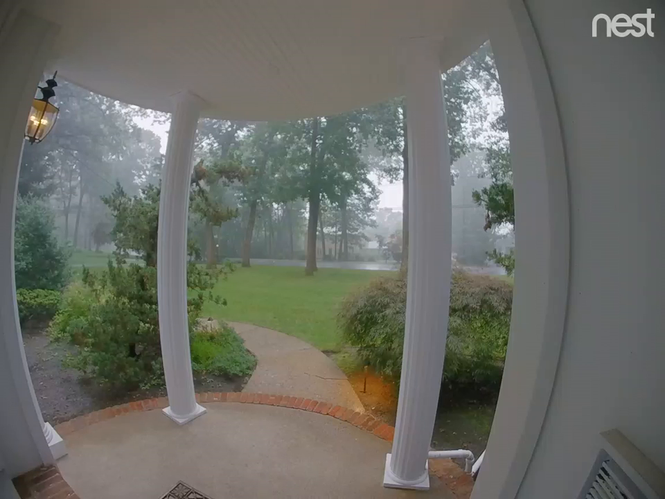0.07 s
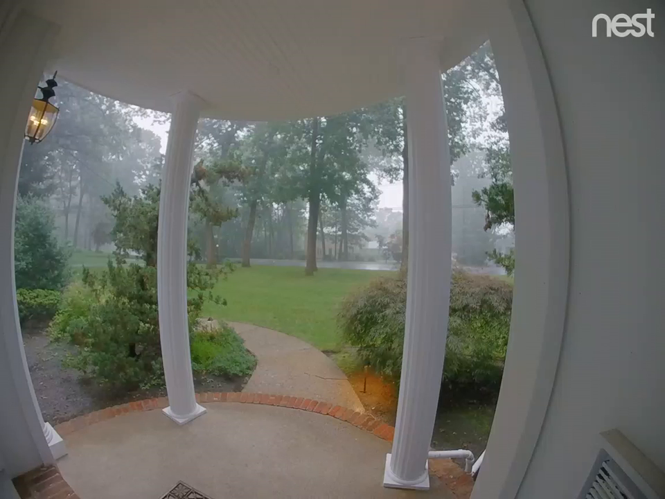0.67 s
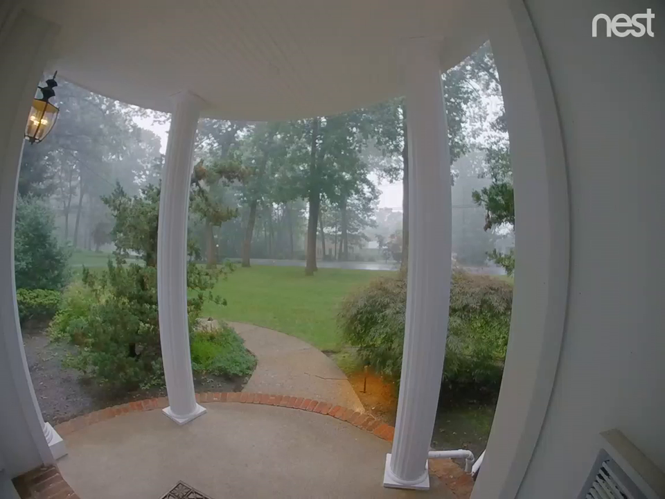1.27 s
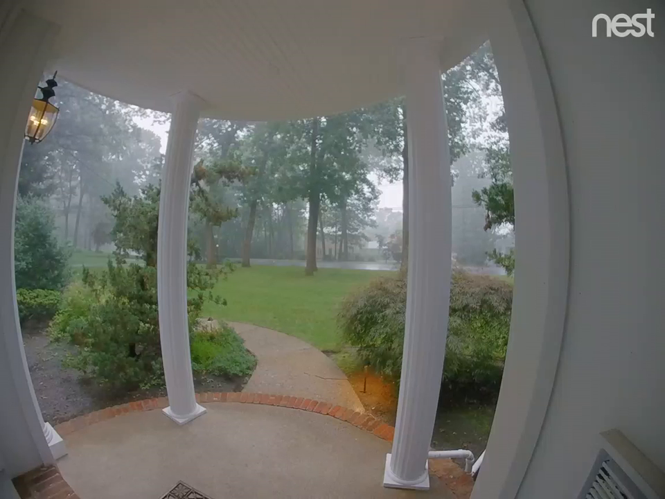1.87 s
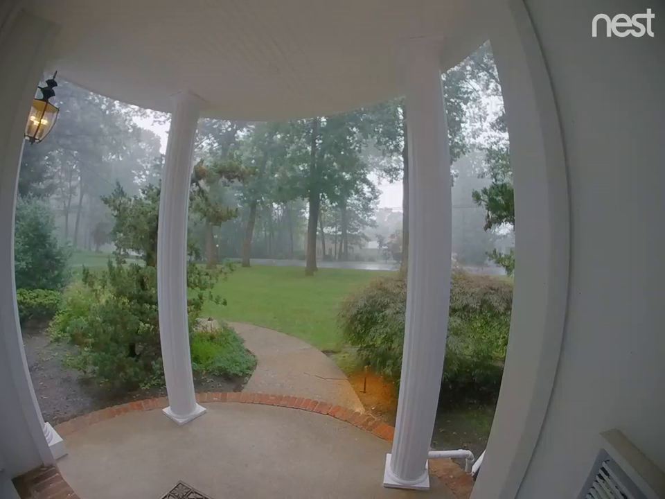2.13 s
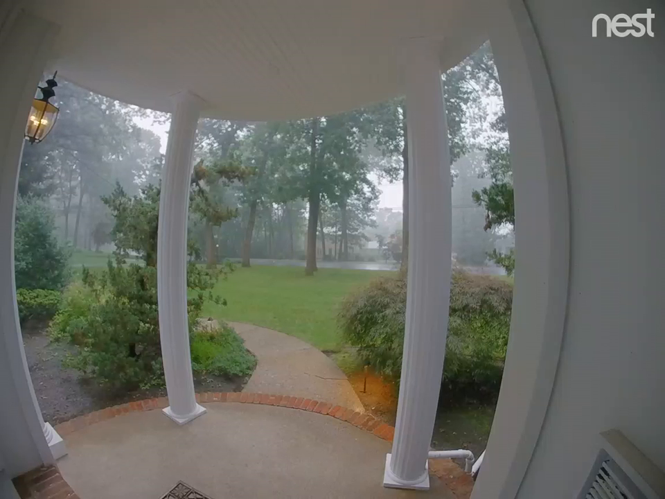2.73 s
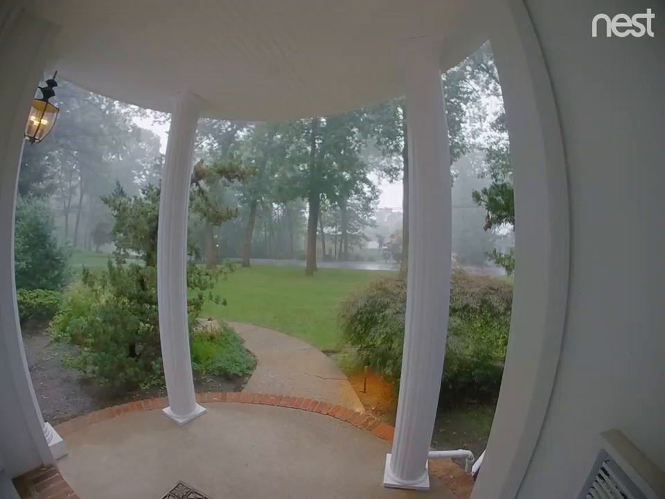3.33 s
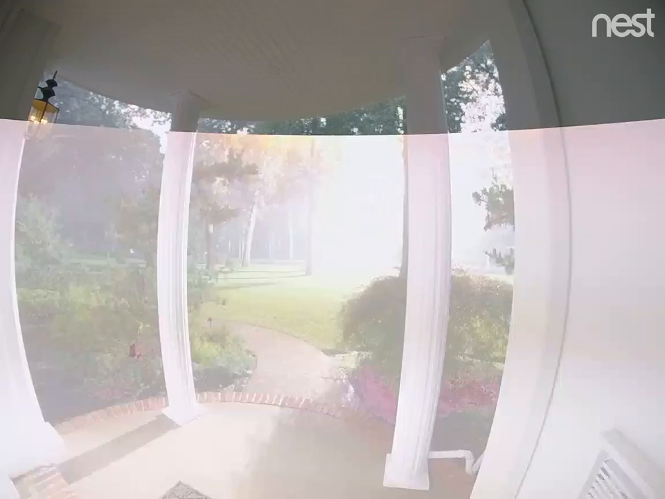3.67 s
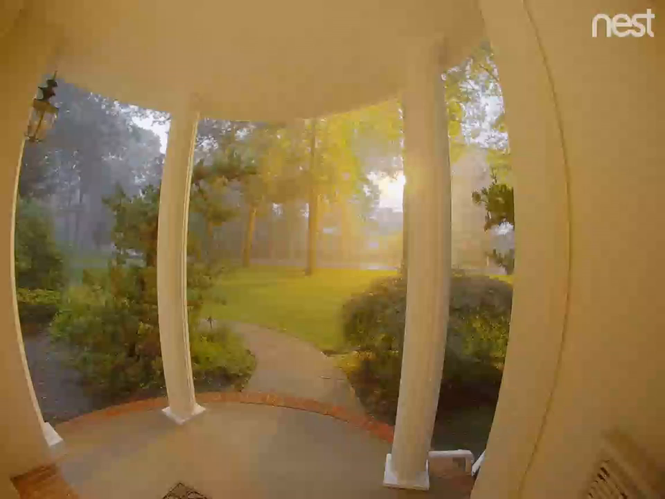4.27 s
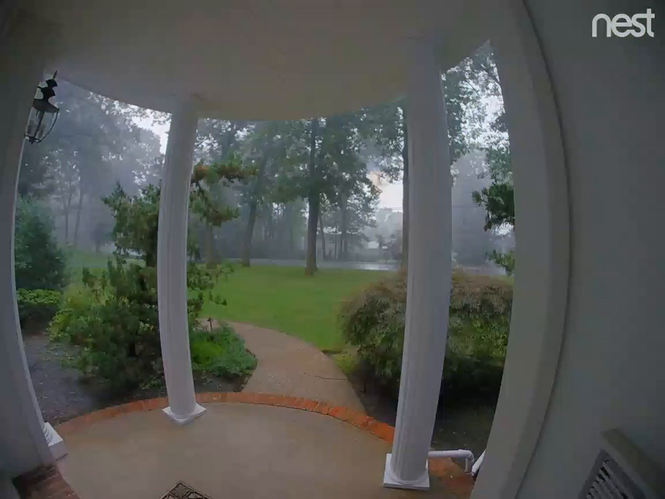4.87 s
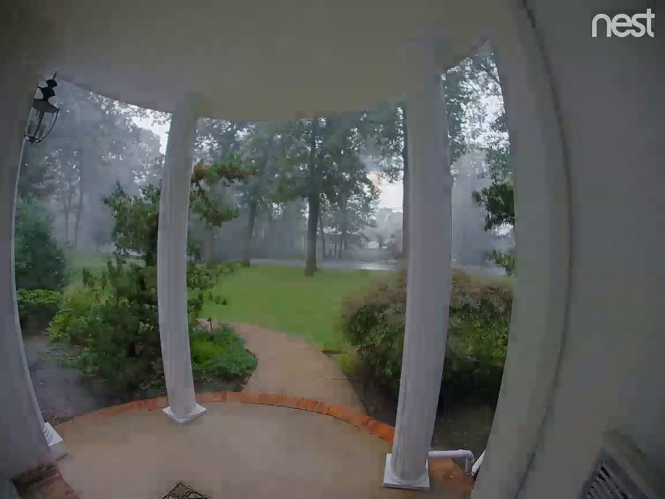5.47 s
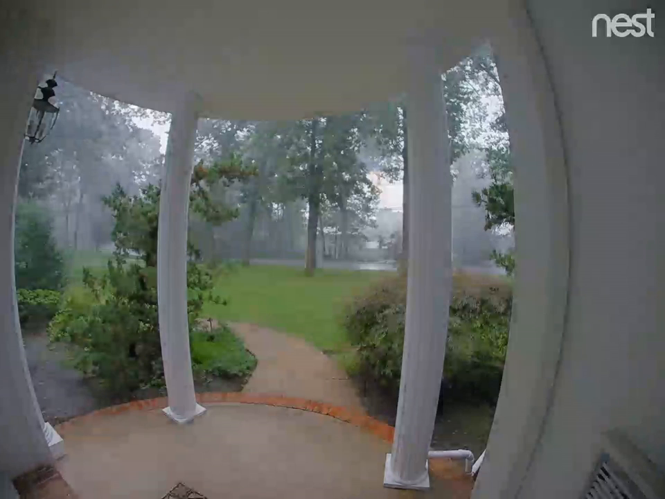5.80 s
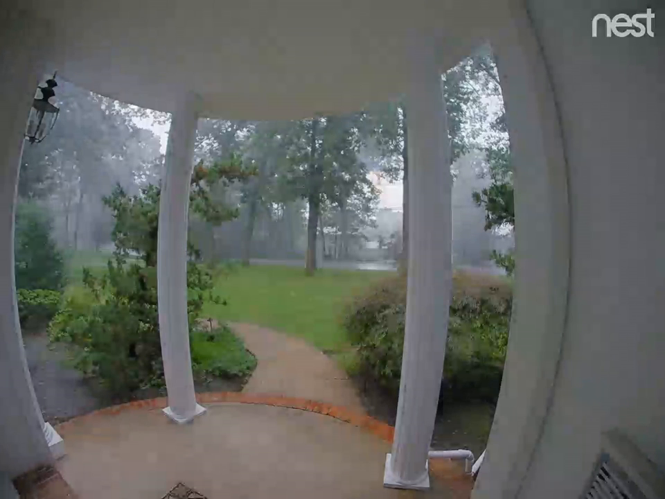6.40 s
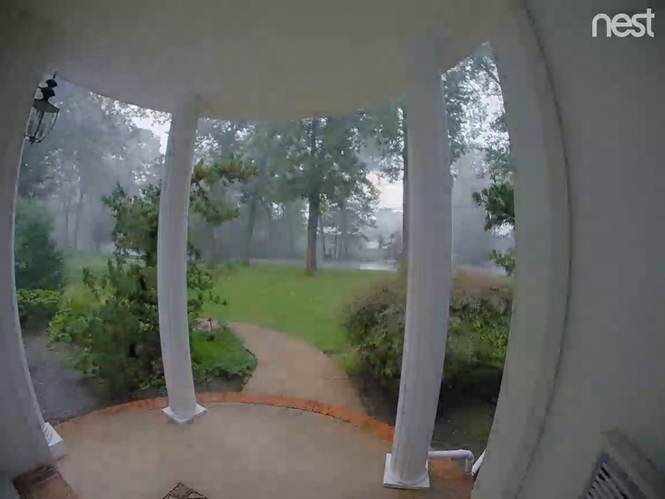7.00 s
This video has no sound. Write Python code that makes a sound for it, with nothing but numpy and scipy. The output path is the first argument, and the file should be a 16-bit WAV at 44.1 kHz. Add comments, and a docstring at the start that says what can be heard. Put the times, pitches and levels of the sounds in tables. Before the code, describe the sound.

From under a covered porch, a small mono microphone picks up quiet rain on leaves and paving and a few soft thumps. Suddenly a nearby thunderclap rips out, bright and very loud, ringing in the porch and distorting slightly. The crackle loses its edge over the next few seconds as several heavy peals roll through, then the thunder sinks to a low mutter over the continuing rain.

```python
"""Steady rain on a garden is heard from under a porch roof, with a few dull thumps.
Near 3.8 s lightning strikes close by: a snap, then shocks from the nearest part of the channel
arrive as a tearing crack. The porch rings with them and the small mono microphone overloads.
Farther parts follow, ever duller as the air absorbs their treble, and roll away as rumble and peals."""
import sys
import numpy as np
from scipy import signal
from scipy.fft import rfft, irfft, next_fast_len
from scipy.io import wavfile
from scipy.ndimage import uniform_filter1d, map_coordinates

SR = 44100
rng = np.random.default_rng(int(sys.argv[2]) if len(sys.argv) > 2 else 0)


def put_to_file(sound):
    """Save the sound as 16-bit audio at rate SR, in the file named by the first command-line argument."""
    columns = np.atleast_2d(sound).T  # one column per channel
    safe = np.clip(columns, -1, 1)
    whole_steps = np.round(safe * 32767)
    wavfile.write(sys.argv[1], SR, whole_steps.astype(np.int16))


N = 314433

# Spectra of the thunder's small, long and stray shocks. Each row: frequency in Hz, relative density in dB.
CRACKLE_SPECTRUM = [(100, -12), (400, 2), (800, -2.5), (1400, 2.5), (2000, 0), (3300, 1.5), (4600, 3.5),
                    (5800, 1.5), (7000, -4.5), (8500, -13), (12000, -42.5)]
RUMBLE_SPECTRUM = [(15, -27.5), (40, -18), (75, -8), (130, 2), (230, 3.5), (400, -1.5), (700, -17.5),
                   (1100, -35), (2500, -65.5), (5000, -100)]
STRAY_SPECTRUM = [(60, -22), (150, -2.5), (225, 1.5), (320, 1), (600, -6), (950, -3.5), (1200, -17.5),
                  (3000, -36), (6000, -66)]
# Rips, where a branch of the channel adds a rush of crackle.
# Each row: centre in seconds, length in seconds, extra level in dB, extra treble in dB.
BRANCH_RIPS = [(3.934, 0.088, 2, 3.5), (4.093, .1, 2.5, 0), (4.347, 0.096, 5.5, 7.5), (4.48, 0.13, 4, 4.5),
               (5.182, 0.36, 5.5, -4), (5.327, 0.041, 9.5, -10), (5.6, 0.15, 3.5, -1),
               (6.045, 0.057, 11.5, -9), (6.121, 0.077, 6.5, -2)]
# Peals from zigzag stretches of the channel. Each row: centre in seconds, length in seconds,
# shocks per second, level in dB, depth of the stray shocks below that level in dB.
ZIGZAG_PEALS = [(3.874, 0.051, 410, -12, 13), (3.988, 0.033, 514, -9, 10), (4.57, 0.067, 283, -16, 16),
                (4.67, 0.1, 181, -14.5, 23.5), (4.76, 0.05, 140, -11.5, 23), (4.9, 0.047, 624, -11.5, 3),
                (5.18, 0.072, 157, -16, 19), (5.299, 0.048, 243, -14.5, 1), (5.346, 0.068, 550, -11.5, 4.5),
                (5.622, 0.042, 560, -10, -3), (5.677, 0.041, 520, -8.5, 10), (5.72, 0.034, 810, -16, 3),
                (5.847, 0.025, 200, -23, 16), (6.041, 0.056, 550, -9.5, -1), (6.098, 0.035, 200, -9.5, 7),
                (6.13, 0.065, 560, -10, 9), (6.345, 0.053, 258, -13, 8.5), (6.619, 0.032, 330, -17.5, 14.5),
                (6.683, 0.047, 478, -20.5, 11), (6.811, 0.057, 839, -31, -4.5), (6.862, 0.031, 570, -22, 7),
                (7.05, 0.035, 220, -23.5, 16), (7.117, 0.051, 264, -14, 27)]
# Resonances of the porch. Each row: frequency in Hz, bandwidth in Hz, gain over the direct sound in dB.
PORCH_MODES = [(137, 43, -8.5), (216, 50, -9), (429.3, 16, 2), (562.4, 18, 6), (699, 14, 1), (820, 20, 3),
               (965, 11, 5.5)]
# Strength of the rain. Each row: time in seconds, level in dB.
RAIN_LEVELS = [(0.03, -51), (1.41, -53), (1.62, -55), (2.08, -53.5), (2.32, -54), (2.39, -53.5),
               (2.88, -55.5), (3.35, -53.5), (3.37, -49), (3.72, -50.5)]
# Spectra of the rain's two layers. Each row: frequency in Hz, relative density in dB.
HISS_SPECTRUM = [(30, -68.5), (410, -32.5), (700, -17), (1010, -5.5), (1500, 0.5), (1700, -2.5),
                 (2560, 0.5), (4540, -1), (7190, -10.5), (8500, -52.5), (11000, -49), (18700, -120)]
WASH_SPECTRUM = [(24, -47.5), (40, -18), (81, -6.5), (119, 0), (254, -1), (401, -2), (703, -8.5),
                 (900, -13), (1170, -33.5), (1980, -120)]
# Thumps before the strike. Each row: centre in seconds, level in dB, pitch in Hz, length in seconds.
DULL_THUMPS = [(1.14, -64, 124.7, 0.078), (2.75, -58, 134, .04), (3.403, -48, 139.6, 0.03),
               (3.557, -50.5, 240, 0.044)]

FRONT_S, FRONT_RISE_S = 3.84, 0.022  # at full strength; time to climb 30 dB
CRACKLE_DB, CRACKLE_FADE_DB_PER_S = -8.5, 8.5
NEAR_TREBLE_DB, FAR_TREBLE_DB, DULLING_S = -1, -23.5, 1.66
RUMBLE_DB, RUMBLE_FLOOR_DB, RUMBLE_CREST_S = -16, -27.5, 1.213  # the crest is timed from the front
RUMBLE_SWELL_DB_PER_S, RUMBLE_FADE_DB_PER_S = 0.5, 10
RIP_THINNING = 0.47  # dB of rumble lost per dB of extra treble: a bright rip holds few long waves
ROLLOFF_HZ, TOP_HZ = 8000, 9044  # upper edge of the microphone's band


def thunder():
    """Travel time spreads one flash into a long roll: later shocks come from farther along the channel."""
    front = amp(30 * np.clip((clock() - FRONT_S) / FRONT_RISE_S, -4, 0))
    age = np.maximum(clock() - FRONT_S, 0)
    rip_db, rip_treble_db = sum(np.outer([db, treble_db], swell(clock() - centre, length))
                                for centre, length, db, treble_db in BRANCH_RIPS)
    return front * (crackle(age, rip_db, rip_treble_db) + rumble(age, rip_treble_db) + peals())


def crackle(age, rip_db, rip_treble_db, flicker_db=2):
    """Air absorption grows with frequency and path, so the dense small shocks arrive ever duller."""
    level_db = CRACKLE_DB - CRACKLE_FADE_DB_PER_S * age + rip_db
    treble_db = FAR_TREBLE_DB + (NEAR_TREBLE_DB - FAR_TREBLE_DB) * np.exp(-age / DULLING_S)
    shocks = impacts(rate=2500, spread_db=0.5) + 0.82 * rng.standard_normal(N)
    hz, t, bins = signal.stft(coloured(porch(shocks), CRACKLE_SPECTRUM), SR, nperseg=512)
    absorption = (np.minimum(hz, TOP_HZ) / 5150) ** 1.6 - 0.2
    tilt_db = np.interp(t, clock(), treble_db + rip_treble_db) * absorption[:, None]
    # Random patches in frequency and time make the colour flicker.
    patches = uniform_filter1d(rng.standard_normal(bins.shape), size=3, axis=0)
    patches = unit(uniform_filter1d(patches, size=18, axis=1))
    dulled = signal.istft(bins * amp(tilt_db + flicker_db * patches), SR, nperseg=512)[1][:N]
    return amp(level_db + 0.8 * wobble(40, N)) * dulled


def rumble(age, rip_treble_db):
    """Long waves from the whole channel superpose; the sum builds slowly, then sinks to a mutter."""
    swell_db = RUMBLE_SWELL_DB_PER_S * np.minimum(age, RUMBLE_CREST_S)
    fade_db = RUMBLE_FADE_DB_PER_S * np.maximum(age - RUMBLE_CREST_S, 0)
    level_db = np.maximum(RUMBLE_DB + swell_db - fade_db, RUMBLE_FLOOR_DB)
    level_db -= RIP_THINNING * np.maximum(rip_treble_db, 0)
    waves = unit(porch(coloured(impacts(rate=900, spread_db=2.5), RUMBLE_SPECTRUM)))
    return amp(level_db + 2.04 * wobble(16, N)) * waves


def peals():
    """Periodicity gives pitch: each zigzag sends a nearly regular train of shocks, amid stray ones."""
    track = np.zeros(N)
    for centre, length, hz, db, under_db in ZIGZAG_PEALS:
        train = wave_train(length, hz, jitter=0.1036, octave_db=-18.5, rough=0.51)
        offset = (np.arange(len(train)) - len(train) // 2) / SR
        strays = coloured(rng.standard_normal(len(offset)), STRAY_SPECTRUM) * swell(offset, length)
        add(track, centre, porch(train), length, db)
        add(track, centre, porch(strays), length, db - under_db)
    return track


def snap(start_s=3.807, db=-32, t60_s=0.06):
    """A bright burst with exponential decay comes just ahead of the main front."""
    age = clock() - start_s
    envelope = (age > 0) * amp(db - 60 * np.abs(age) / t60_s)
    return envelope * coloured(rng.standard_normal(N), CRACKLE_SPECTRUM)


def porch(x):
    """Standing waves between floor, roof and wall add their resonances to the direct sound."""
    return filtered(x, lambda f: 1 + sum(amp(db) * 1j * f * width / (hz * hz - f * f + 1j * f * width)
                                         for hz, width, db in PORCH_MODES))


def rain(hiss_db=2, wash_db=-7.5):
    """Far drops sum incoherently to a hiss; near ones tick on leaves and paving, over a low wash."""
    level_db = np.interp(clock(), *np.transpose(RAIN_LEVELS))
    drops = rng.standard_normal(N) + amp(-12) * impacts(rate=500, spread_db=4.5)
    hiss = amp(level_db + hiss_db + 0.16 * wobble(4.4, N)) * coloured(drops, HISS_SPECTRUM)
    wash_gain = amp(level_db + wash_db + 0.88 * wobble(10, N))
    return hiss + wash_gain * coloured(rng.standard_normal(N), WASH_SPECTRUM)


def thumps():
    """A few uneven cycles at low frequency are heard as a dull thump."""
    track = np.zeros(N)
    for centre, db, hz, length in DULL_THUMPS:
        add(track, centre, wave_train(length, hz, jitter=0.29, octave_db=-7, rough=0.18), length, db)
    return track


def wave_train(length, hz, jitter, octave_db, rough):
    """Random frequency and amplitude modulation roughen a swell of pressure waves."""
    offset = np.arange(SR * 2 // 5) / SR - 0.2
    cycles = np.cumsum(hz * (1 + jitter * wobble(hz / 2, len(offset)))) / SR + rng.random()
    wave = np.sin(2 * np.pi * cycles) + amp(octave_db) * np.sin(4 * np.pi * cycles)
    return wave * (1 + rough * wobble(hz, len(offset))) * swell(offset, length)


def swell(offset, length, rise_shape=3.2, fall_shape=2.6):
    """An envelope, offset seconds from its centre, that sets in more abruptly than it ends."""
    return np.exp(-np.abs(offset / (0.63 * length)) ** np.where(offset < 0, rise_shape, fall_shape))


def add(track, centre, sound, length, db):
    """Mix in a sound with the energy of level db held for length seconds."""
    start = round(centre * SR) - len(sound) // 2
    part = track[start:start + len(sound)]
    part += (amp(db) * sound * np.sqrt(length * SR / np.sum(sound ** 2)))[:len(part)]


def impacts(rate, spread_db):
    """Shot noise: impulses of scattered size at random moments, rate a second."""
    hits = rng.random(N) < rate / SR
    return unit(hits * rng.choice([-1, 1], N) * amp(spread_db * rng.standard_normal(N)))


def wobble(rate, size):
    """A smooth curve through random knots, rate a second."""
    knots = np.random.default_rng(rng.integers(2 ** 32)).standard_normal(int(size * rate / SR) + 4)
    return map_coordinates(knots, [np.arange(size) * rate / SR])


def coloured(x, spectrum):
    """Spectral shaping by (Hz, dB) points, scaled to rms 1."""
    hz, db = np.transpose(spectrum)
    return unit(filtered(x, lambda f: amp(np.interp(np.log(f + 1), np.log(hz), db))))


def filtered(x, response):
    """A linear filter multiplies the spectrum by its frequency response."""
    size = next_fast_len(len(x) + SR // 10)
    return irfft(rfft(x, size) * response(np.fft.rfftfreq(size, 1 / SR)), size)[:len(x)]


def amp(db):
    return 10 ** (np.asarray(db) / 20)


def unit(x):
    return x / np.sqrt(np.mean(x ** 2) + 1e-20)


def clock():
    return np.arange(N) / SR


def scene():
    """The pressures of all sources add at one point under the roof."""
    mono = rain() + thumps() + snap() + thunder()
    return np.array([mono, mono])


def record(dry, gain_db=2.01, ceiling=0.69, hardness=6):
    """Saturation flattens the highest peaks in one band-limited microphone, which feeds both channels."""
    pressure = amp(gain_db) * dry[0]
    flattened = pressure / (1 + np.abs(pressure / ceiling) ** hardness) ** (1 / hardness)
    mono = filtered(flattened, lambda f: (f < TOP_HZ) / np.sqrt(1 + (f / ROLLOFF_HZ) ** 60))
    return np.array([mono, mono])


dry = scene()
out = record(dry)
put_to_file(out)
```